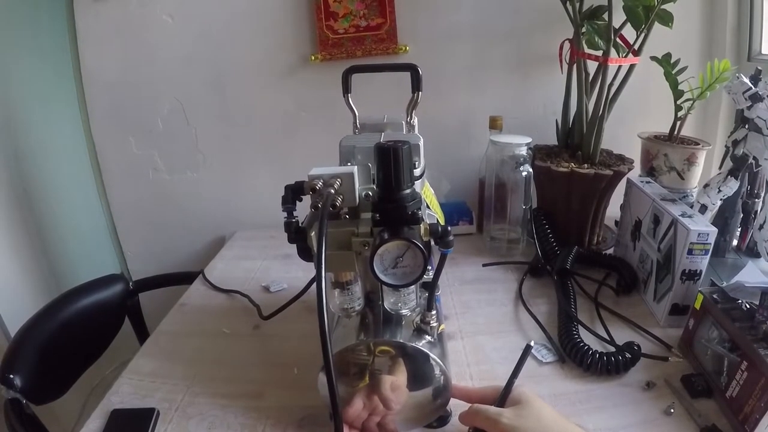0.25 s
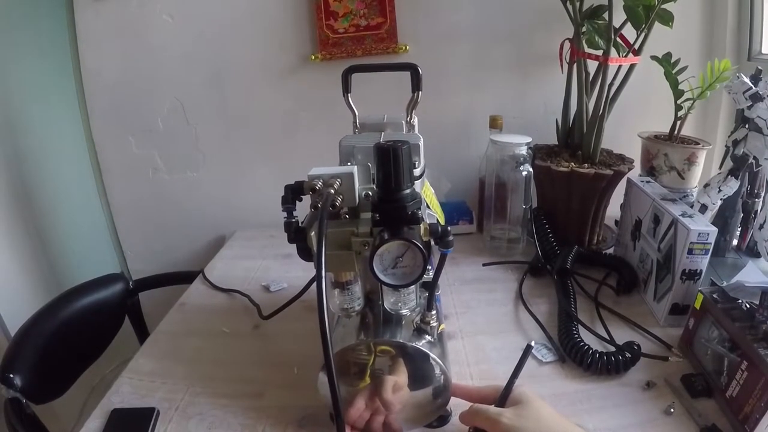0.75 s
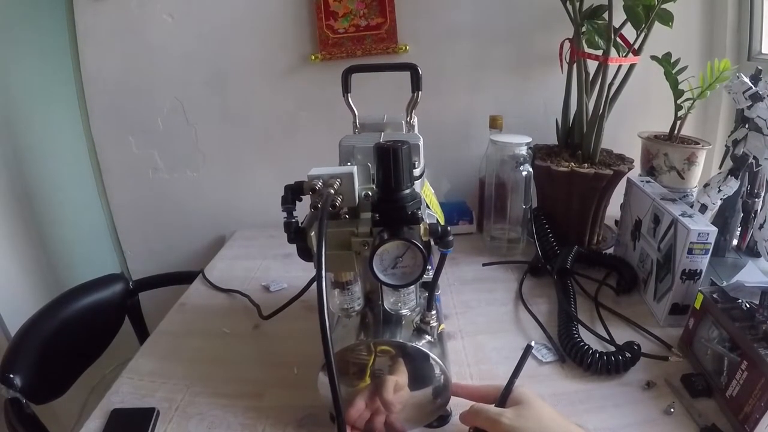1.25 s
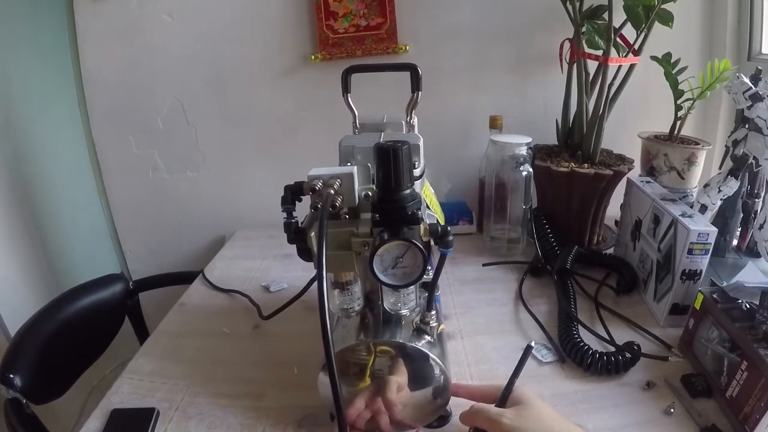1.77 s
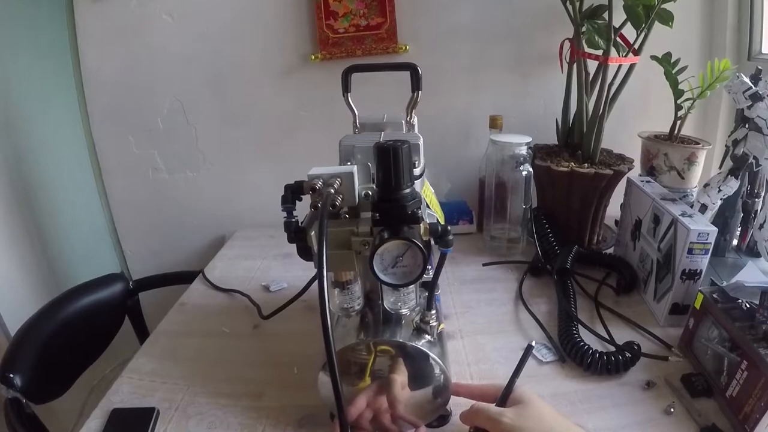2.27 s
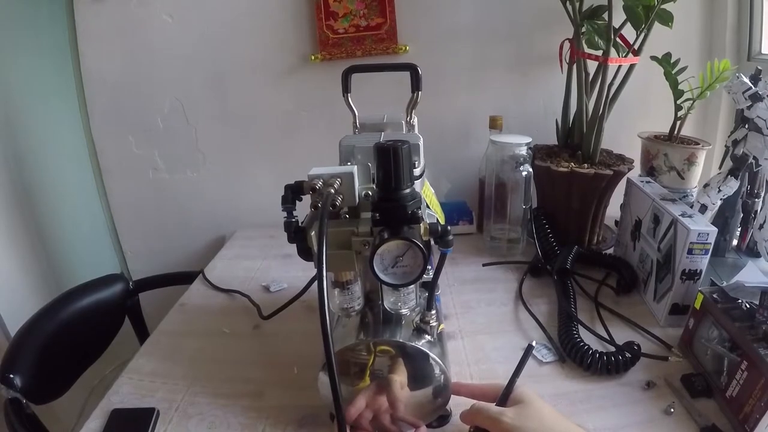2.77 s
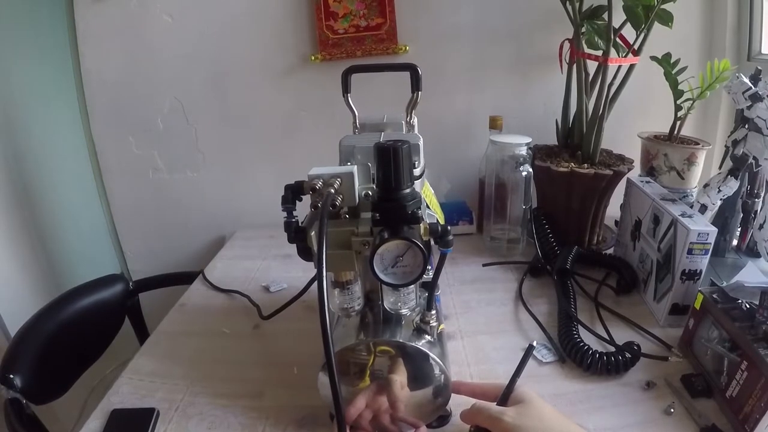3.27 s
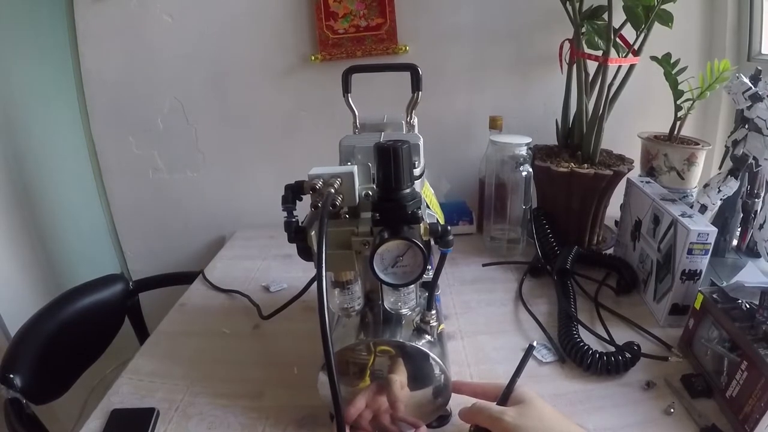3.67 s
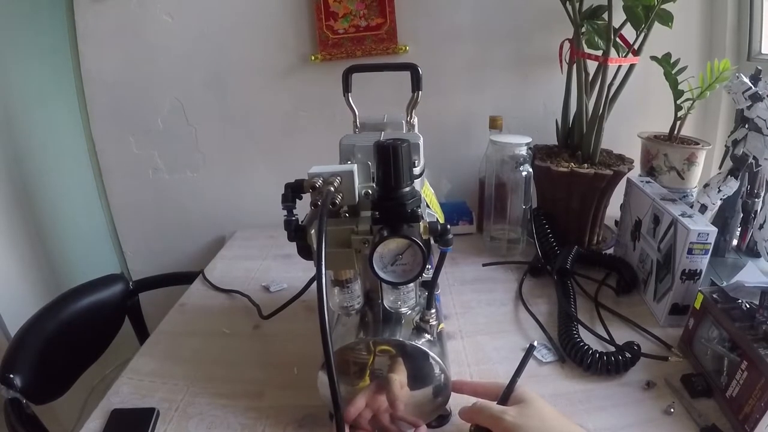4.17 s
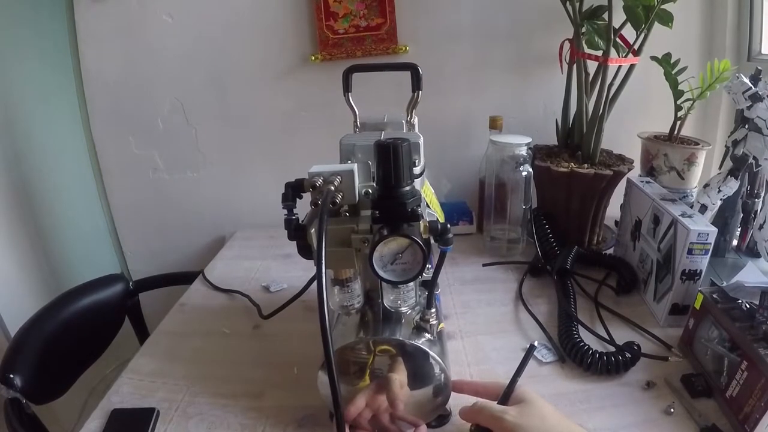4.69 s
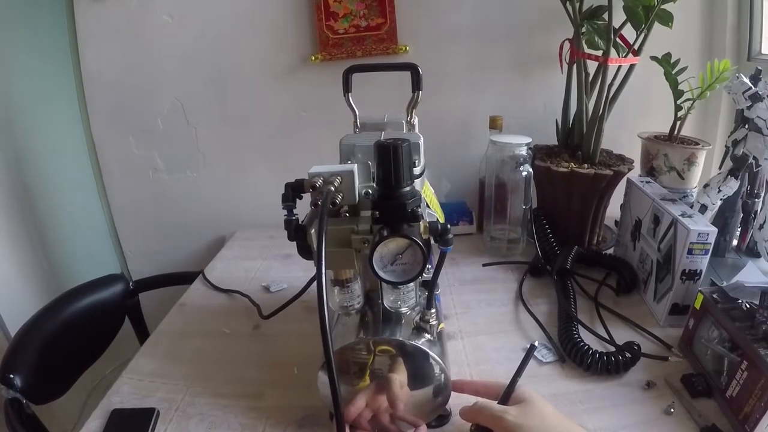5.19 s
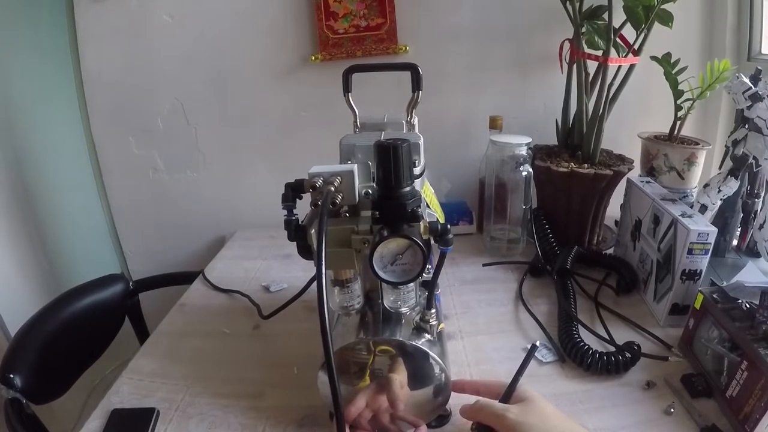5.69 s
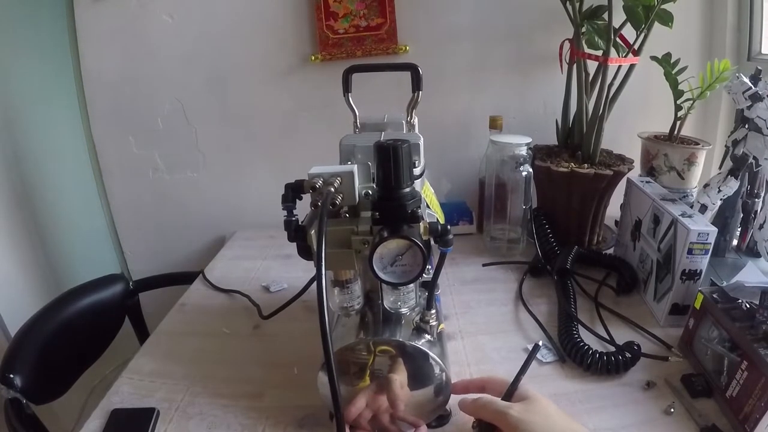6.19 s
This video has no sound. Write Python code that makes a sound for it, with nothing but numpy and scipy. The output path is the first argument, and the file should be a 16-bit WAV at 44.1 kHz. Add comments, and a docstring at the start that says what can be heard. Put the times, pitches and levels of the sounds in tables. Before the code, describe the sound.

Continuous close drone of a little desktop air compressor, humming and chugging very fast, its metallic buzz thinning as the throb grows stronger.

```python
"""A small single-piston air compressor runs on a wooden desk in a small room, close to the microphone.
From the start, cooling air rushes, valves and bearings tick each turn, and motor hum beats with piston throb.
The pump eases within 0.6 s; the shaking leans further to the hum, with fine sizzle and three early scuffs.
Around 4 s the shaking moves to even crank orders, the sizzle drops and the pump works harder.
After 5 s brief scuffs return. Sources are summed tones, filtered noise and clicks ringing resonances."""
import sys
import numpy as np
from scipy import signal
from scipy.fft import rfft, irfft
from scipy.io import wavfile
from scipy.ndimage import uniform_filter1d, minimum_filter1d

SR = 44100
rng = np.random.default_rng(int(sys.argv[2]) if len(sys.argv) > 2 else 0)


def generate_wav(sig):
    """Save sig (samples, or channels by samples) to the path in sys.argv[1] as 16-bit PCM at SR."""
    pcm = np.round(np.clip(np.atleast_2d(sig).T, -1, 1) * 32767).astype(np.int16)
    wavfile.write(sys.argv[1], SR, pcm)


N = 284004
STROKE_AT_TURN = .56


def from_db(db):
    """Decibels to amplitude gain."""
    return 10 ** (np.asarray(db) / 20)


def in_time(rows):
    """Second column of a (time, value) curve, interpolated at every sample."""
    time_s, value = np.transpose(rows)
    return np.interp(np.arange(N) / SR, time_s, value)


def at_hz(points, hz):
    """Spectrum interpolated on a log-frequency axis."""
    point_hz, value = np.transpose(points)
    return np.interp(np.log(hz + 1e-3), np.log(point_hz), value)


def drift(rate_hz, step=64):
    """Slow noise of spread 1, drawn every `step` samples and low-passed near rate_hz."""
    count = N // step + 2
    hz = np.fft.rfftfreq(count, step / SR)
    spectrum = rfft(rng.standard_normal(count)) / (1 + (hz / rate_hz) ** 2)
    slow = irfft(spectrum, count)
    return np.interp(np.arange(N) / step, np.arange(count), slow / slow.std())


def tone(cycles):
    """Cosine of rms 1."""
    return np.sqrt(2) * np.cos(2 * np.pi * cycles)


def dying_noise(t60_s, size=8192):
    """Two unit-energy noise decays: many modes or echoes at once."""
    decay = from_db(-60 * np.arange(size) / SR / t60_s)
    tail = rng.standard_normal((2, size)) * decay
    return tail / np.sqrt(np.sum(tail ** 2, axis=1, keepdims=True))


# level difference of the two microphone ports: (frequency [Hz], left minus right [dB])
PORT_TILT = [(100, -3), (250, -2), (450, -4), (720, -15.5), (950, -4), (1200, -5.5), (1700, -2), (6000, 0),
             (9000, -3), (14000, -2)]
# correlation of the two ports: (frequency [Hz], correlation [-1 to 1])
PORT_LIKENESS = [(50, 0.995), (150, 0.95), (400, 0.8), (700, -0.14), (1150, -0.73), (1900, 0.0063),
                 (3100, 0.77), (5200, 0.48), (8500, -0.031), (14000, 0.53)]


def at_ports(pair, spectrum):
    """Colours two unrelated signals and mixes them to the ports' correlation and tilt."""
    size = pair.shape[-1]
    hz = np.fft.rfftfreq(size, 1 / SR)
    mid, side = rfft(pair) * from_db(at_hz(spectrum, hz))
    alike = np.clip(at_hz(PORT_LIKENESS, hz), -1, 1)
    sign = np.array([[1], [-1]])
    both = np.sqrt((1 + alike) / 2) * mid + sign * np.sqrt((1 - alike) / 2) * side
    tilt = from_db(sign * at_hz(PORT_TILT, hz) / 2)
    return irfft(both * tilt, size)


def strikes(turns, mains, share, uneven_db=1.0, torque_db=1.0, jitter_s=.00004):
    """One click a turn near a fixed crank angle; its level follows the mains cycle via motor torque."""
    at = np.interp(np.arange(int(turns[-1])) + share, turns, np.arange(N))
    chance = rng.standard_normal((len(at), 2))
    at = np.clip(at + jitter_s * SR * chance[:, 0], 0, N - 1).astype(int)
    clicks = np.zeros(N)
    clicks[at] = from_db(uneven_db * chance[:, 1] + torque_db * tone(mains[at]))
    return clicks


# air and rumble before pulse, tilt and effort: (frequency [Hz], density [dB per Hz])
AIR_SPECTRUM = [(12, -67.5), (28, -51.5), (45, -57), (65, -42), (85, -52.5), (108, -48), (135, -50.5),
                (175, -54.5), (330, -57.5), (580, -59), (760, -67.5), (1050, -71.5), (1650, -74.5),
                (2600, -89.5), (6000, -105), (14000, -122)]


def cooling_air(turns, pulse_db=-1.0):
    """Fan rush and rumble: coloured noise whose level pulses twice a turn."""
    white = rng.standard_normal((2, N)) * np.sqrt(SR / 2)  # unit power per Hz
    pulse = from_db(pulse_db * tone(2 * (turns - STROKE_AT_TURN)))
    return at_ports(white * pulse, AIR_SPECTRUM)


# relative colour of the chafing: (frequency [Hz], level [dB])
SIZZLE_SPECTRUM = [(1800, -15.5), (2950, -10.5), (3150, 0), (3550, -7), (4000, -4), (4600, -5.5),
                   (5300, -0.5), (6700, -2), (7400, -5), (8000, -11.5), (9600, -14.5), (11000, -26.5),
                   (12400, -24.5), (14500, -36)]
# brief swells of the chafing: (time [s], peak level [dB])
CHAFING_SWELLS = [(.25, -43), (.83, -42), (1.54, -43), (5.185, -48), (5.345, -46.5), (5.835, -46),
                  (5.925, -48), (5.975, -46), (6.175, -48), (6.265, -50), (6.335, -45.5), (6.425, -48)]
SIZZLE_DB, SIZZLE_RISE_DB = -50.5, 13.5  # at lean 0; gain at lean 1
CASING_T60_S = .09


def sizzle(turns, shake, lean, shake_db=1.3, stroke_db=0.74, flutter_db=1.23, scuff_s=0.015):
    """Metallic chafing: noise grows with the hum's lean, follows each swing and rings the casing."""
    swing_db = shake_db * shake / shake.std() + stroke_db * tone(2 * (turns - .42))
    level = from_db(SIZZLE_DB + SIZZLE_RISE_DB * lean ** 2 + flutter_db * drift(40))
    t = np.arange(N) / SR
    scuffs = np.zeros(N)
    for time_s, peak_db in CHAFING_SWELLS:
        scuffs += from_db(peak_db) * np.exp(-((t - time_s) / scuff_s) ** 2 / 2)
    grains = rng.standard_normal((2, N)) * from_db(swing_db)
    casing = signal.fftconvolve(grains, dying_noise(CASING_T60_S), axes=1)[:, :N]
    out = at_ports(grains + casing, SIZZLE_SPECTRUM)
    return np.hypot(level, scuffs) * out / out.std()


# relative ring of the steel reed valves: (frequency [Hz], level [dB])
REED_SPECTRUM = [(3000, -23), (3600, -6), (3800, 3), (3960, -4), (4250, -19.5), (4850, -19), (5000, 4),
                 (5300, -2.5), (5650, -18), (6200, -10), (7000, -24), (9000, -28.5), (12000, -49)]


def reeds(turns, level_db=-53.0, outlet_at=.425, inlet_at=.80, inlet_db=-0.5, fall_db=33.5):
    """Outlet and inlet reeds: a noise burst each per turn, falling by fall_db over that turn."""
    outlet = from_db(-fall_db * ((turns - outlet_at) % 1))
    inlet = from_db(inlet_db - fall_db * ((turns - inlet_at) % 1))
    bursts = rng.standard_normal((2, N)) * np.hypot(outlet, inlet)
    out = at_ports(bursts, REED_SPECTRUM)
    return from_db(level_db) * out / out.std()


# light bearing and linkage contacts: (crank position [turns], relative level [dB])
LIGHT_CONTACTS = [(.015, 0), (.125, 2), (.195, -3.5), (.26, 3), (.62, 1), (0.679, -3), (.865, 2),
                  (.975, 0.5)]
# relative ring of the crankcase: (frequency [Hz], level [dB])
CASE_SPECTRUM = [(700, -20), (900, -13.5), (1060, -9.5), (1230, 7.5), (1380, -10.5), (1520, 2), (1760, 5.5),
                 (1860, -18.5), (2100, -17.5), (2300, -5), (2450, -31.5), (6500, -23.5), (11000, -45.5)]


def clatter(turns, mains, level_db=-44.5, t60_s=0.012, room_t60_s=0.35, room_db=-20.0):
    """Each contact rings the crankcase in its own way, alike every turn, and the room answers."""
    out = np.zeros((2, N))
    for share, db in LIGHT_CONTACTS:
        ringing = dying_noise(t60_s) + from_db(room_db) * dying_noise(room_t60_s)
        clicks = strikes(turns, mains, share)
        out += from_db(db) * signal.fftconvolve(clicks[None], ringing, axes=1)[:, :N]
    out = at_ports(out, CASE_SPECTRUM)
    return from_db(level_db) * out / out.std()


# mains harmonics shifted by crank orders, levels before effort:
# (crank order, multiple of the hum, left level [dB], right level [dB])
MOTOR_SIDEBANDS = [(-2, 1, -42, -41), (-4, 2, -38, -37), (1, 1, -36, -34), (2, 1, -37, -35),
                   (0, 2, -42, -40), (18, 1, -35, -29), (20, 1, -49, -40), (22, 1, -47, -37),
                   (23, 1, -46, -35), (24, 1, -48, -36), (26, 1, -55, -38)]


def motor(turns, mains):
    """Rotor bars cut the pulsing field and shift the hum by multiples of the crank speed."""
    out = np.zeros((2, N))
    for order, multiple, left_db, right_db in MOTOR_SIDEBANDS:
        wave = tone(order * turns + multiple * mains + rng.random())
        out += from_db([[left_db], [right_db]]) * wave
    return out


# even orders that shake the desk: (crank order, level at lean 0 [dB],
# yield to the hum [exponent: 1 = fully, below 0 = grows with it])
DESK_ORDERS = [(2, -26.5, -0.39), (4, -18, 0.68), (6, -15.5, 1)]
HUM_DB = -12.6  # ceiling, scaled by lean


def desk_shake(turns, mains, lean, waver_db=1.33):
    """Magnetic hum and even crank orders drive the desk and beat; lean sets their balance."""
    angle = np.pi / 2 * np.clip(lean, .02, .95)
    out = from_db(HUM_DB) * np.sin(angle) * tone(mains + 1 / 4)
    for order, db, yielding in DESK_ORDERS:
        gain = from_db(db + waver_db * drift(1.5)) * np.cos(angle) ** yielding
        out = out + gain * tone(order * (turns - STROKE_AT_TURN))
    return out


# piston throb, levels before waver and effort: (crank order, left level [dB], right level [dB])
THROB_ORDERS = [(1, -46, -45), (3, -36, -35), (5, -33, -32), (7, -41, -41), (8, -43, -42), (9, -39, -38),
                (10, -45, -44), (11, -36, -35), (12, -37, -36), (13, -33, -31), (14, -31, -29),
                (15, -36, -34), (16, -35, -32), (17, -42, -38), (18, -38, -34), (19, -44, -40),
                (20, -53, -48), (21, -49, -44), (22, -55, -49), (23, -39, -33), (24, -49, -40),
                (25, -47, -37), (26, -49, -40), (27, -65, -55), (28, -51, -38), (29, -67, -54),
                (30, -60, -46), (31, -66, -43), (32, -55, -38), (33, -57, -45), (34, -61, -46),
                (35, -56, -42), (36, -58, -48), (37, -66, -51), (39, -62, -55), (40, -61, -53),
                (41, -57, -49), (42, -58, -52), (43, -58, -53), (45, -59, -50)]


def piston(turns, waver_db=.5, tank_order=14.5, tank_width=4.2, tank_lag=0.28, wing_lag=0.55,
           compact_order=22., scatter=.15):
    """One puff a turn: orders in the tank's resonance align, others lag, the room scatters high ones."""
    out, load = np.zeros((2, N)), drift(0.98)
    for order, left_db, right_db in THROB_ORDERS:
        # lags in cycles of the order
        lag = tank_lag + wing_lag * min(abs(order - tank_order) / tank_width, 1) ** 6
        lag += scatter * (order / compact_order) ** 6 * rng.standard_normal()
        waver = from_db(waver_db * (load + drift(3.0)) / 2)
        wave = tone(order * (turns - STROKE_AT_TURN) - lag) * waver
        out += from_db([[left_db], [right_db]]) * wave
    return out


# cylinder head modes: (frequency [Hz], relative level [dB], t60 [s], left minus right [dB])
HEAD_MODES = [(1198, -36, 0.018, -12), (1381, -33, 0.011, -9.5), (1516, -31, 0.017, 6),
              (1672, -30.5, 0.025, -6.5), (1695, -32, 0.037, 2.5)]
KNOCK_AT_TURN, REBOUND_AT_TURN = .405, .487


def knock(turns, mains, level_db=2.0, rebound_db=-11.0, contact_hz=1790.0):
    """The piston knocks at the top of each stroke, rebounds once and rings the cylinder head."""
    clicks = strikes(turns, mains, KNOCK_AT_TURN, uneven_db=0.5, torque_db=-0.3)
    clicks = clicks + from_db(rebound_db) * strikes(turns, mains, REBOUND_AT_TURN, jitter_s=.0001)
    contact = signal.butter(8, contact_hz, fs=SR, output="sos")
    clicks = signal.sosfilt(contact, clicks + 1e-18)  # offset avoids denormals
    out = np.zeros((2, N))
    for k, (hz, db, t60_s, pan_db) in enumerate(HEAD_MODES):
        r = np.exp(-np.log(1000) / (t60_s * SR))
        w = 2 * np.pi * hz / SR
        ring = signal.lfilter([.5, 0, -.5], [1, -2 * r * np.cos(w), r * r], clicks)
        gain = from_db(db + np.array([[pan_db], [-pan_db]]) / 2)
        out += (-1) ** k * gain * ring  # alternate polarity
    return from_db(level_db) * out


# crank speed: (time [s], speed [turns per s])
CRANK_SPEED = [(0, 21.932), (2.4, 21.929), (3.6, 21.946), (4.4, 21.963), (6.44, 21.964)]
# how hard the pump works: (time [s], level [dB])
PUMP_EFFORT = [(0, 1.5), (.6, -1), (3.7, -1), (4.4, 1), (6.44, 1.6)]
# desk shaking balance: (time [s], lean [0 = crank's throb, 1 = motor's hum])
SHAKE_LEAN = [(0, 0.41), (.45, 0.81), (2.2, 0.85), (2.4, 0.64), (3.75, 0.62), (4.15, 0.15), (6.44, 0.11)]
HUM_HZ = 100  # twice the mains frequency


def scene(motor_share=0.59, air_share=0.28):
    """Crank and hum phases drive the layers; motor and air follow part of the pump's effort."""
    turns = np.cumsum(in_time(CRANK_SPEED)) / SR
    mains = HUM_HZ * np.arange(N) / SR  # hum cycles
    effort_db = in_time(PUMP_EFFORT)
    lean = in_time(SHAKE_LEAN)
    shake = desk_shake(turns, mains, lean)
    hum = shake * from_db([[-.4], [.4]])
    hum = hum + from_db(motor_share * effort_db) * motor(turns, mains)
    pump = piston(turns) + knock(turns, mains) + clatter(turns, mains) + reeds(turns)
    pump = from_db(effort_db) * pump
    air = from_db(air_share * effort_db) * cooling_air(turns)
    return hum + pump + air + sizzle(turns, shake, lean)


CUTOFF_HZ = 14300


def record(dry, size=601):
    """A limiter eases down the highest crests; a steep low-pass cuts the top."""
    allowed = np.minimum(1, .76 / (np.abs(dry).max(axis=0) + 1e-9))
    gain = uniform_filter1d(minimum_filter1d(allowed, size), size)
    low_pass = signal.ellip(10, .1, 90, CUTOFF_HZ, fs=SR, output="sos")
    return signal.sosfilt(low_pass, gain * dry)


dry = scene()
out = record(dry)
generate_wav(out)
```